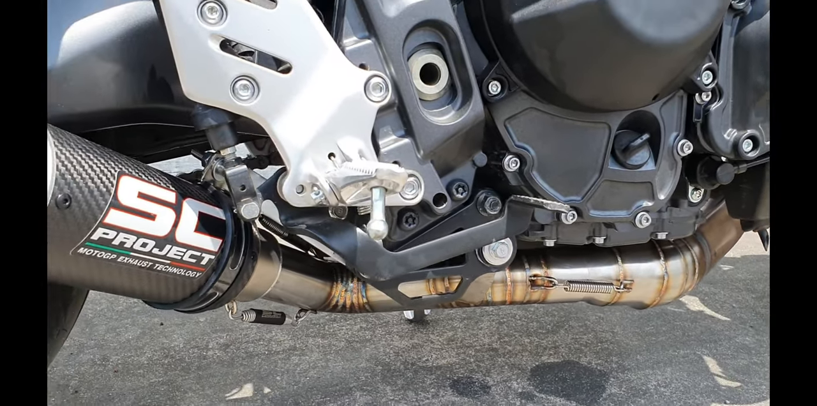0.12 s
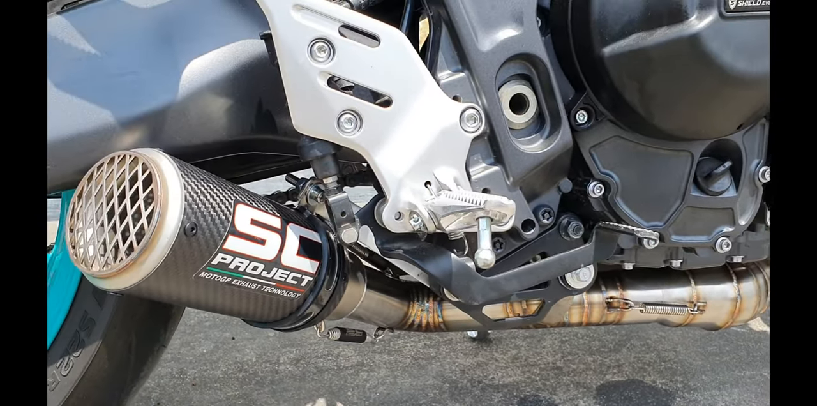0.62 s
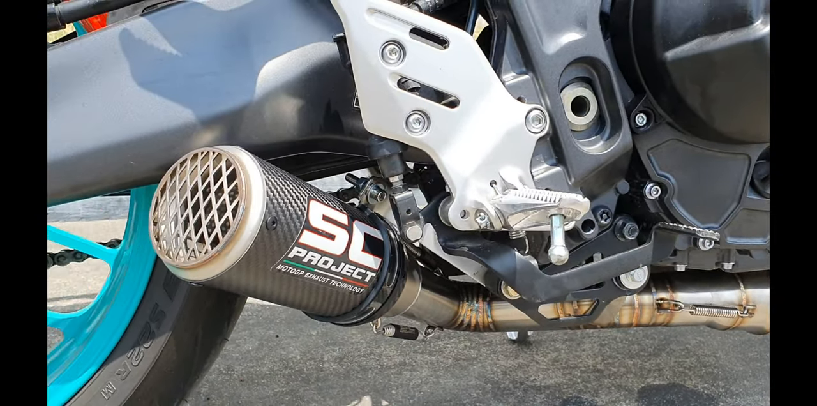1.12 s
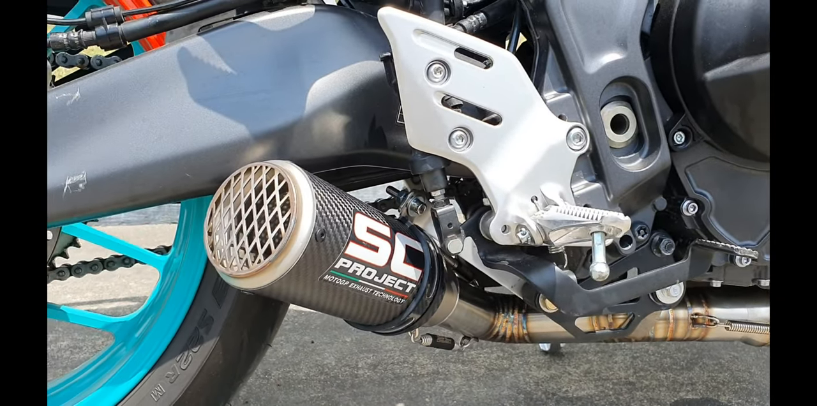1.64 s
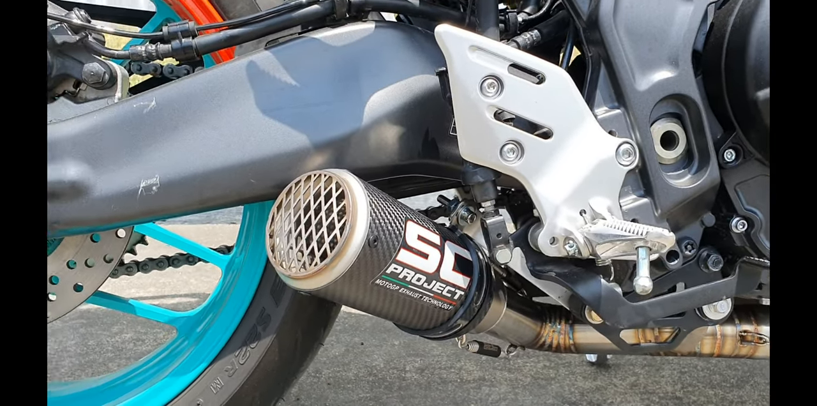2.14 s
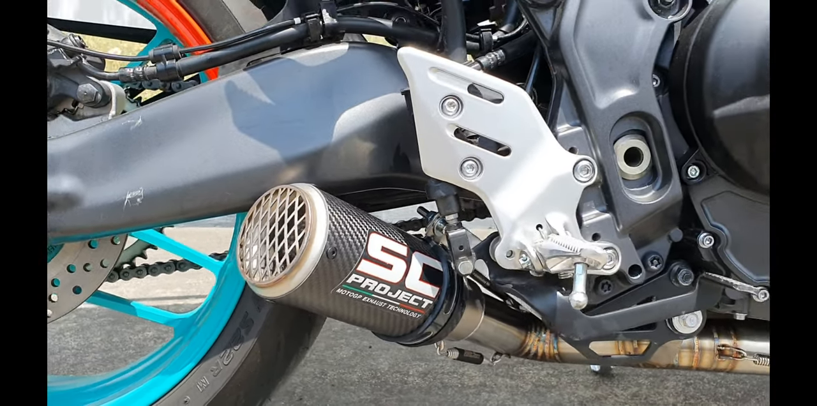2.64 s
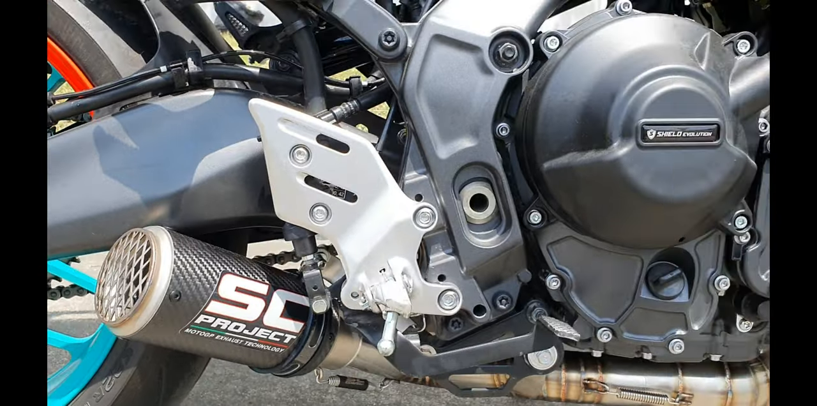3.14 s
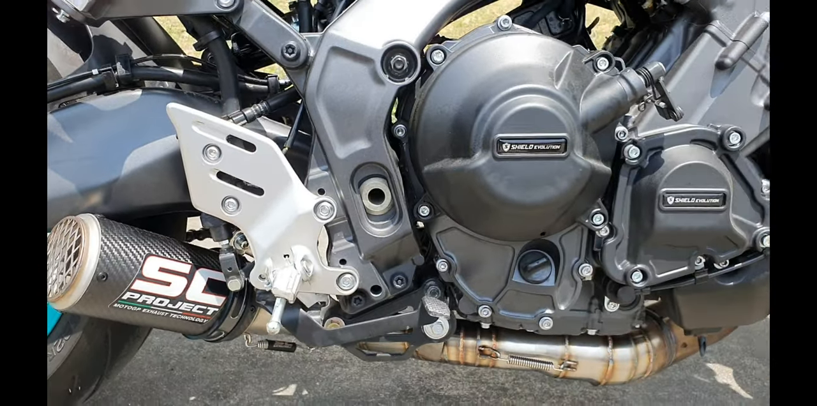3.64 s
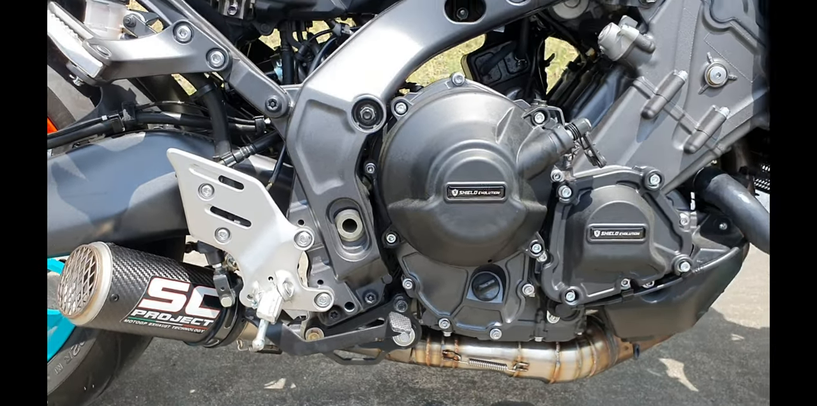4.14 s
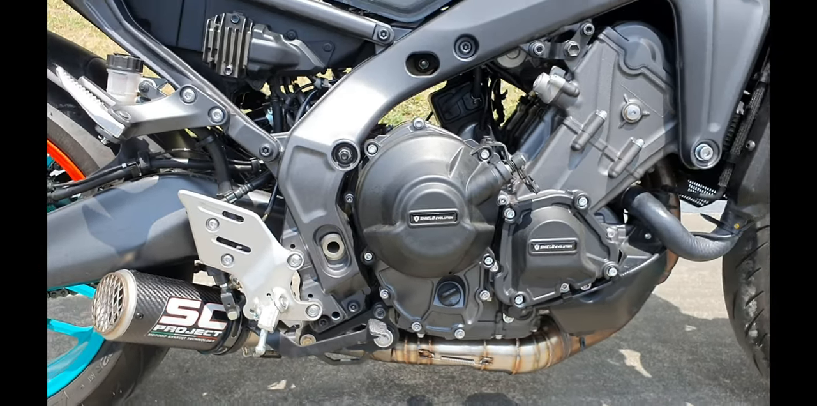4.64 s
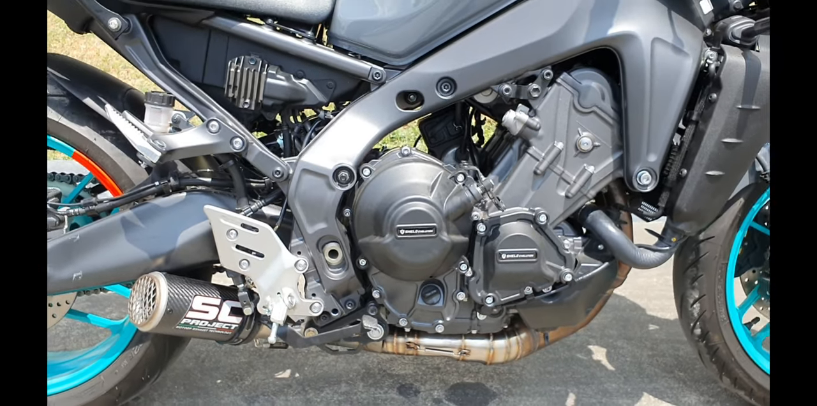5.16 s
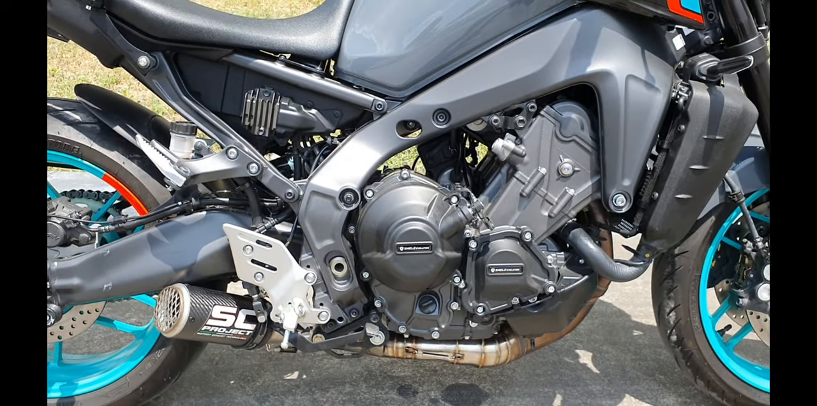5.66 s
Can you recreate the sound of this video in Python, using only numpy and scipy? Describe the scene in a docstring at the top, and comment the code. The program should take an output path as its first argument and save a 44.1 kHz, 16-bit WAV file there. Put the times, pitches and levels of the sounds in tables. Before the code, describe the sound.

A three-cylinder motorcycle idles outdoors, heard close up on a hand-held stereo microphone. Rapid low exhaust pulses merge into a throaty, hollow growl that wavers slightly, with occasional weak beats. Gear whine, metallic rustle and hiss lie beneath. After about three seconds the pipe's ring softens as the microphone drifts toward the engine, and the mechanical noise comes forward. The throttle is never opened.

```python
"""A three-cylinder motorcycle growls at idle, parked outdoors, its speed hunting and some firings weak.
Each firing sends a pressure pulse that rings the exhaust pipe and short open silencer.
Gears whine and rustle the engine cases over a hiss that beats with the crank; the valve gear ticks.
A hand-held camera drifts from the tailpipe towards the engine, so boom and ring fall, engine noise rises."""
import sys
import numpy as np
from scipy import signal
from scipy.fft import rfft, irfft
from scipy.io import wavfile
from scipy.ndimage import uniform_filter1d

SR = 44100
rng = np.random.default_rng(int(sys.argv[2]) if len(sys.argv) > 2 else 0)


def waveform_to_disk(signal):
    """Save audio, clipped to [-1, 1], as 16-bit WAV at the path in sys.argv[1]."""
    frames = np.transpose(np.atleast_2d(signal))
    scaled = np.clip(frames, -1, 1) * 32767
    samples = np.round(scaled).astype(np.int16)
    wavfile.write(sys.argv[1], SR, samples)


def level_to_linear(level):
    """Convert decibel levels to linear amplitude factors, elementwise."""
    exponent = np.asarray(level, float) / 20
    return 10 ** exponent


N = 254898
LEAD_SAMPLES = 3000  # run before time zero, so the pipe already rings

# camera moves: time_s, exhaust_db, off_axis (0-1, from the tailpipe's axis), near (0-1, to the engine)
CAMERA_MOVES = [(0, -12.5, 0, 0), (1.2, -12.5, 0.2, 0.1), (2.0, -12, 0.3, 0), (2.9, -12.5, 0.05, 0.2),
                (3.3, -11.5, 0.58, 0.87), (3.8, -12, 0.68, 1), (4.3, -11, 1, 0.94),
                (4.8, -13.5, 0.62, 0.93), (5.3, -13, 0.6, 0.84), (5.78, -13.5, .15, 0.99)]


def evened(x):
    """Scales to rms 1, all channels together."""
    return x / np.sqrt(np.mean(x ** 2) + 1e-20)


def read(points, hz):
    """Reads a spectrum on a log-frequency axis."""
    f, value = np.transpose(points)
    return np.interp(np.log(hz + 1), np.log(f + 1), value)


def curves(rows, lead=0):
    """Every column of a table at every sample, from lead samples before time zero."""
    s, *columns = np.transpose(rows)
    return [np.interp(np.arange(-lead, N) / SR, s, c) for c in columns]


def ring(hz, width_hz, size=4000):
    """One struck mode: a sine that dies exponentially."""
    t = np.arange(size) / SR
    return np.exp(-np.pi * width_hz * t) * np.sin(2 * np.pi * hz * t)


def swell(hz, width_hz, size=4000):
    """A mode that builds up softly and dies, peak near 1."""
    t = np.pi * width_hz * np.arange(size) / SR
    return np.e * t * np.exp(-t) * np.sin(2 * hz * t / width_hz)


def resonate(x, hz, width_hz):
    """A resonance of gain 1 at its centre."""
    return signal.lfilter(*signal.iirpeak(hz, hz / width_hz, SR), x)


def coloured(x, gain):
    """Multiplies the spectrum by gain(Hz)."""
    return irfft(rfft(x) * gain(np.fft.rfftfreq(N, 1 / SR)), N)


def pair(grain_db, lag_samples=4):
    """Grainy noise at two microphones, mostly shared in the bass and mostly unrelated in the top treble."""
    # left-right likeness: pitch_hz, likeness (0-1)
    likeness_points = [(400, .9), (800, .65), (1300, .35), (2000, .55), (4500, .6), (8000, .2),
                       (12000, .25)]

    def likeness(hz):
        return np.clip(read(likeness_points, hz), 0, 1)

    grain = level_to_linear(grain_db * np.minimum(rng.exponential(1, (2, N)), 6))
    left, other = rng.standard_normal((2, N)) * grain
    shared = coloured(np.roll(left, round(lag_samples)), likeness)
    unrelated = coloured(other, lambda hz: np.sqrt(1 - likeness(hz) ** 2))
    return evened(np.array([left, shared + unrelated]))


def beat(fired, firing_db, firing_at, turn_db, turn_at):
    """Gain that peaks once a firing and once a crank turn (three firings in two turns)."""
    per_firing_db = firing_db * np.cos(2 * np.pi * (fired - firing_at))
    per_turn_db = turn_db * np.cos(2 * np.pi * (fired * 2 / 3 - turn_at))
    return level_to_linear(per_firing_db + per_turn_db)


def ticks():
    """Sharp ticks of the valve gear: dying noise bursts through one bright resonance each."""
    # ticks: start_s, peak_db, pitch_hz
    tick_rows = [(0.9153, -45, 8000), (2.1834, -38, 7120), (2.4014, -42, 7290), (3.0729, -36, 10000),
                 (3.7414, -31, 13200), (4.6119, -38, 7170), (4.7955, -43, 10400)]
    decay_s, width_hz = .0033, 2500
    out, t = np.zeros((2, N)), np.arange(600) / SR
    for start_s, peak_db, hz in tick_rows:
        burst = rng.standard_normal((2, len(t))) * np.exp(-t / decay_s)
        click = resonate(burst, hz, width_hz)
        out[:, round(start_s * SR):][:, :len(t)] += level_to_linear(peak_db) * click / abs(click).max()
    return out


def fizz(fired):
    """High-band grainy noise that pulses hard with firings and crank turns."""
    noise = pair(grain_db=6.0) * beat(fired, 7.5, .11, 4.0, .37)
    band = signal.butter(2, [8500, 15500], "band", fs=SR, output="sos")
    return evened(signal.sosfilt(band, noise))


def hiss(fired):
    """Broad coloured noise that beats gently with the crank."""
    # hiss spectrum: pitch_hz, relative_db (per Hz)
    hiss_spectrum = [(260, -63), (450, -2), (561, -8), (1210, -13.5), (1700, -15.5), (2080, -13.5),
                     (2450, -13.5), (4050, -11), (8090, -32), (11700, -32.5), (15200, -41.5)]
    noise = pair(grain_db=2.0) * beat(fired, .91, .064, .51, .12)
    return evened(coloured(noise, lambda hz: level_to_linear(read(hiss_spectrum, hz))))


def case_rustle(fired, near):
    """Noise from the gear train excites the ringing engine cases, each mode a double resonance."""
    # case modes: pitch_hz, width_hz, far_db, near_db
    case_modes = [(1035, 83, -6, -9), (1447, 91, -6.5, 0.5), (2093, 122, 6.5, 2.5), (2420, 93, -22, 2),
                  (3080, 460, -10, 2.5), (3415, 160, 0.5, 2), (4020, 460, -10, -6.5), (4220, 330, -9, -1.5)]
    cases = np.zeros((2, N))
    for hz, width_hz, far_db, near_db in case_modes:
        rustle = pair(grain_db=2.5, lag_samples=rng.integers(-30, 30)) * beat(fired, 2.4, .32, .55, .15)
        mode = evened(resonate(resonate(rustle, hz, width_hz), hz, width_hz))
        cases += level_to_linear(far_db + near * (near_db - far_db)) * mode
    return evened(cases)


def whine(fired, near):
    """Overtones of the gear mesh swoop with the crank's uneven turning and swell as the teeth take load."""
    # load bursts, once a camshaft turn: place_firings (0-3), mesh_overtone, far_db, near_db
    tooth_loads = [(0.92, 1, -8.5, -3.5), (2.8, 1, -10.5, -3), (0.47, 2, -8, -16), (0.92, 2, -5, -0.5),
                   (1.73, 2, -14, -0.5), (2.34, 2, -5, -3.5), (.2, 3, 7, -2.5), (1.26, 3, 1, -2),
                   (2.333, 3, 6, 3.5), (0.62, 3, -10, -7), (1.7, 3, 0, -7.5), (2.82, 3, -15, -3),
                   (0.3, 4, -2, -1), (1.4, 4, -36, -9), (1.42, 4, -2, -3.5), (1.78, 4, -6, -1.5),
                   (2.3, 4, -3, -2), (2.5, 4, -10, -7.5), (0.33, 5, -7, -11), (0.81, 5, -10.5, -14),
                   (1.32, 5, -5, -14), (1.63, 5, -10.5, -14), (2.3, 5, -10.5, -12), (2.8, 5, -8.5, -13),
                   (0.75, 6, -22, -12), (1.8, 6, -18, -18), (3, 6, -18, -14)]
    # part of the cases each overtone leaves: left_lead_rad (at time zero), camera_pan_rad_per_s
    overtone_leads = [(.4, 0), (-2.5, 1.1), (3.7, -.55), (4.3, -1.6), (0, 0), (-1.5, 0)]
    teeth, ripple_share, fastest_at_firings = 47, .04, .05  # crank gear; speed ripple in each firing
    burst_sigma_firings, spread_db = .12, 1.55  # spread from burst to burst
    rough_rad = .75  # rms by which reflections blur the phase between the microphones

    ripple_firings = ripple_share * np.sin(2 * np.pi * (fired - fastest_at_firings)) / (2 * np.pi)
    crank_turns = (fired + ripple_firings) * 2 / 3
    loud = np.zeros((6, N))
    for place, overtone, far_db, near_db in tooth_loads:
        cam_turn = np.round((fired - place) / 3)
        burst_db = spread_db * rng.standard_normal(70)[cam_turn.astype(int) + 1]
        off_firings = fired - place - 3 * cam_turn
        burst = np.exp(-.5 * (off_firings / burst_sigma_firings) ** 2)
        loud[round(overtone) - 1] += level_to_linear(far_db + near * (near_db - far_db) + burst_db) * burst

    out = np.zeros((2, N))
    for k, (level, (lead_rad, pan_rad_per_s)) in enumerate(zip(loud, overtone_leads), 1):
        # radians of gear backlash, and of hand shake between the microphones
        backlash, shake = np.cumsum(rng.standard_normal((2, N)), axis=1) * [[.022 * k], [.001]]
        apart = lead_rad + pan_rad_per_s * np.arange(N) / SR + shake
        apart = apart + rough_rad * evened(uniform_filter1d(rng.standard_normal(N), size=200))
        mesh_rad = 2 * np.pi * k * teeth * crank_turns + backlash
        out += level * np.cos(mesh_rad + np.outer([.5, -.5], apart))
    return out


def engine(fired):
    """Rustling cases, hiss, fizz and gear whine, balanced left-right by frequency and louder when near."""
    # stereo balance: pitch_hz, left_minus_right_db
    balance_points = [(600, 1.5), (1280, 0), (2360, 4.5), (4350, .5), (8000, -0.5)]
    engine_db, near_gain_db = -37, 1.5
    near = curves(CAMERA_MOVES)[2]
    mix = level_to_linear(-6) * case_rustle(fired, near)
    mix += level_to_linear(1) * hiss(fired)
    mix += level_to_linear(-27.5 + 4.7 * near) * fizz(fired)
    mix += level_to_linear(1.3) * whine(fired, near)
    tilted = np.array([coloured(side, lambda hz: level_to_linear(share * read(balance_points, hz)))
                       for side, share in zip(mix, (.5, -.5))])
    return level_to_linear(engine_db + near_gain_db * near) * tilted


def pipe_sound(train):
    """Smooth pressure pulses ring the modes of the exhaust pipe and silencer."""
    # pipe modes: pitch_hz, width_hz, signed_strength
    pipe_modes = [(66.75, 24.8, -.118), (99.4, 53.2, .115), (202.5, 52.2, .297), (247.1, 40.6, -.518),
                  (292.1, 41.6, -1.188), (292.5, 78.0, 2.194), (330.1, 74.3, -.561)]
    pulse_sigma_s = .00066
    response = sum(strength * ring(hz, width_hz) for hz, width_hz, strength in pipe_modes)
    pulse = np.exp(-.5 * (np.arange(-150, 151) / SR / pulse_sigma_s) ** 2)
    rung = signal.oaconvolve(train, response)[:len(train)]
    return signal.oaconvolve(rung, pulse / pulse.sum(), "same")


def exhaust(fired):
    """Firings of varying strength and timing ring the pipe; its ring beams along the tailpipe's axis."""
    # modes each firing strikes unevenly: pitch_hz, width_hz, steady_db, random_db
    uneven_modes = [(33.7, 170, -30, -30.5), (79, 18, -48, -46.5), (146.4, 32, -64, -42.5),
                    (264.2, 12.8, -53.5, -49.5), (314, 63, -48, -38.5), (393, 35, -63, -49.5),
                    (446, 64, -45.5, -57), (484, 82, -64, -50), (634.5, 81, -50, -58.5),
                    (796, 143, -52.5, -66)]
    # strength of the three cylinders in turn: level_db
    cylinder_db = [0, .2, -.2]
    # weak firings: time_s, change_db
    weak_firings = [(1.1, -1.5), (3.046, -4.5), (3.876, -6), (4.243, -2), (4.616, -2.5), (5.257, -1.8),
                    (5.537, -12)]
    pan_db, pan_db_per_s, right_late_ms = 1.47, -.16, .27  # slides from the left towards the middle
    bass_cut_hz = 50.6

    at = np.flatnonzero(np.diff(np.floor(fired))) + 1
    chance = rng.standard_normal((len(at), 2 + len(uneven_modes)))
    at = at + np.round(.00011 * SR * chance[:, -1]).astype(int)  # combustion a little early or late
    blow_db = np.resize(cylinder_db, len(at)) + .45 * chance[:, 0]
    for s, change_db in weak_firings:
        blow_db[np.argmin(abs((at - LEAD_SAMPLES) / SR - s))] += change_db
    train = np.zeros(len(fired))
    train[at] = level_to_linear(blow_db)
    sound = pipe_sound(train)

    level_db, off_axis = curves(CAMERA_MOVES, LEAD_SAMPLES)[:2]
    off_axis = np.clip(off_axis, 0, 1)
    boom_gain = level_to_linear(1.23 - 4.5 * off_axis)
    ring_gain = level_to_linear(1.2 - 12.5 * off_axis ** 2.17)  # the power shapes the beam
    boom, silencer_ring = resonate(sound, 62, 71), resonate(sound, 288.3, 46)
    sound += (boom_gain - 1) * boom + (ring_gain - 1) * silencer_ring

    for k, (hz, width_hz, steady_db, random_db) in enumerate(uneven_modes):
        strikes = np.zeros(len(fired))
        strikes[at] = train[at] * (level_to_linear(steady_db) + level_to_linear(random_db) * chance[:, 1 + k])
        facing = ring_gain if hz > 300 else 1  # the upper growl beams from the tailpipe
        sound += facing * signal.oaconvolve(strikes, swell(hz, width_hz))[:len(fired)]

    bass_cut = signal.butter(4, bass_cut_hz, "high", fs=SR, output="sos")
    sound = evened(signal.sosfilt(bass_cut, sound))
    ms = np.arange(len(fired)) * 1000 / SR
    both = np.array([sound, np.interp(ms - right_late_ms, ms, sound)])
    left_minus_right_db = pan_db + pan_db_per_s * np.arange(-LEAD_SAMPLES, N) / SR
    return (both * level_to_linear(level_db + np.outer([.5, -.5], left_minus_right_db)))[:, LEAD_SAMPLES:]


def scene():
    """Exhaust and engine follow one hunting idle speed; ticks come at set times."""
    # idle speed: time_s, firings_per_s
    idle_speed = [(0.0, 32.19), (0.022, 32.12), (0.489, 31.53), (0.635, 33.45), (1.058, 33.13),
                  (1.112, 32.44), (1.334, 32.23), (1.602, 32.48), (1.739, 31.27), (1.851, 32.74),
                  (2.496, 31.49), (2.57, 32.37), (2.793, 33.3), (2.926, 33.45), (3.342, 31.55),
                  (3.651, 33.78), (3.702, 33.05), (3.912, 31.86), (4.05, 33.35), (4.335, 31.66),
                  (4.558, 32.89), (4.806, 32.32), (5.034, 33.5), (5.255, 32.26), (5.274, 31.99),
                  (5.8, 32.36)]
    firings_at_zero = -.687
    turning = np.cumsum(curves(idle_speed, LEAD_SAMPLES)[0]) / SR
    fired = firings_at_zero + turning - turning[LEAD_SAMPLES]  # running count of firings
    return exhaust(fired) + engine(fired[LEAD_SAMPLES:]) + ticks()


def band_limit(x):
    """A steep low-pass at the top of the band."""
    return signal.sosfilt(signal.butter(12, 15390, fs=SR, output="sos"), x)


def record(dry):
    """The finished mix as the camera delivers it."""
    return band_limit(dry)


dry = scene()
out = record(dry)
waveform_to_disk(out)
```